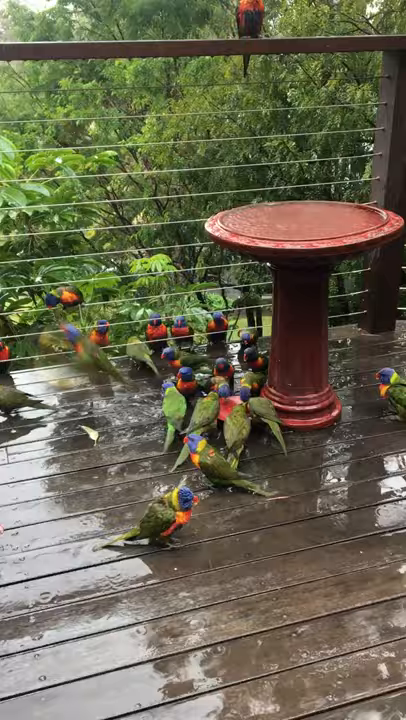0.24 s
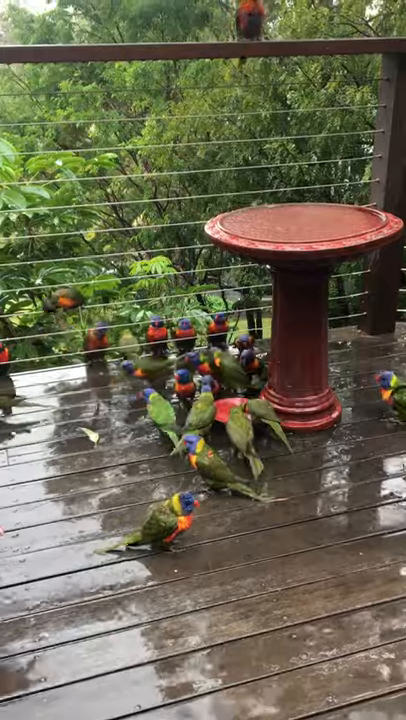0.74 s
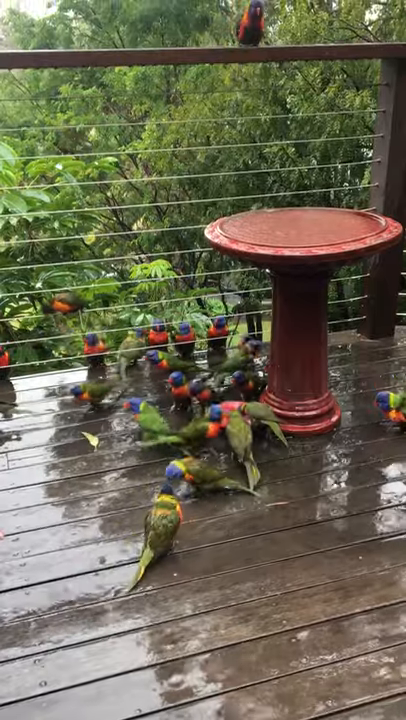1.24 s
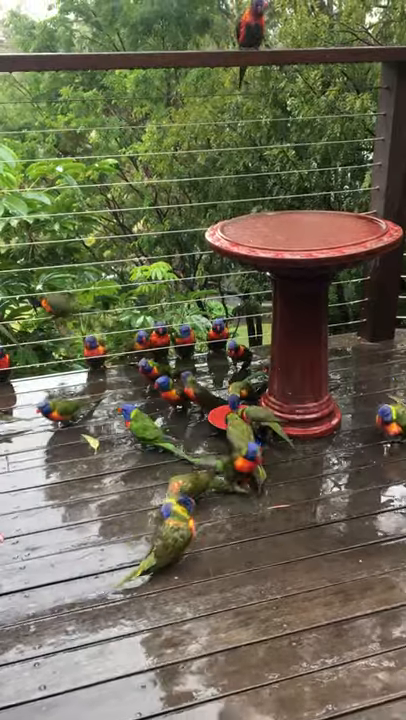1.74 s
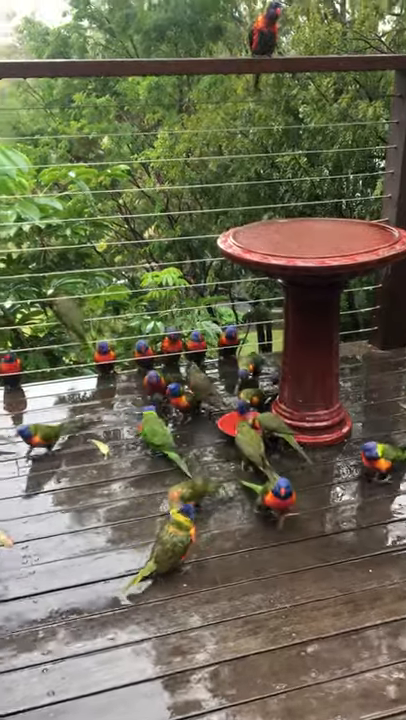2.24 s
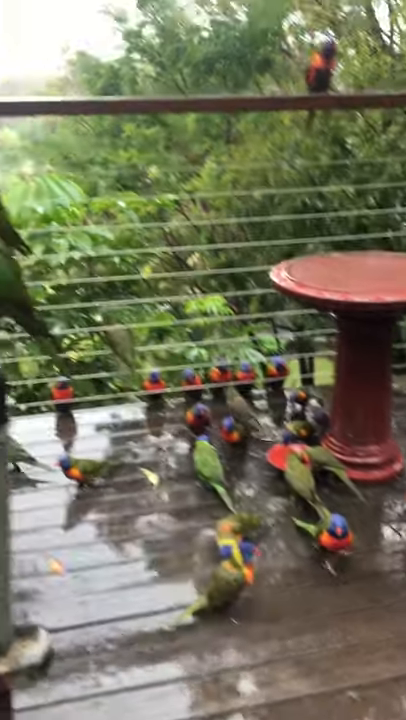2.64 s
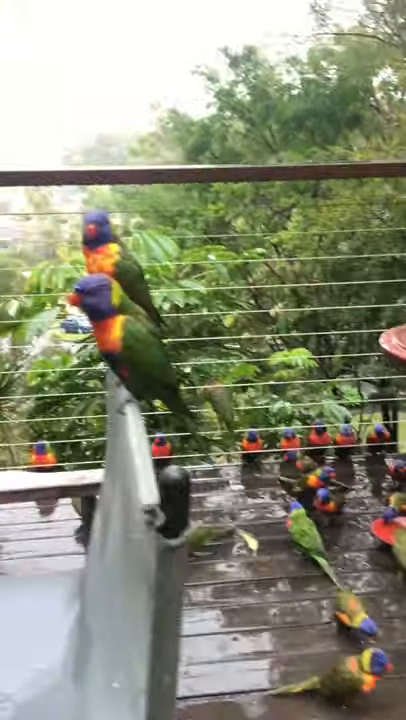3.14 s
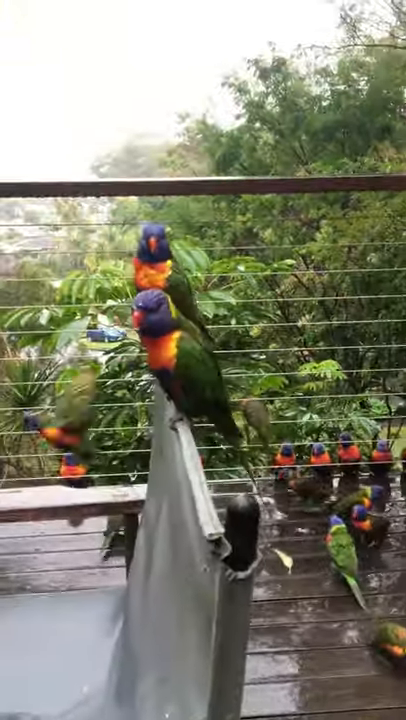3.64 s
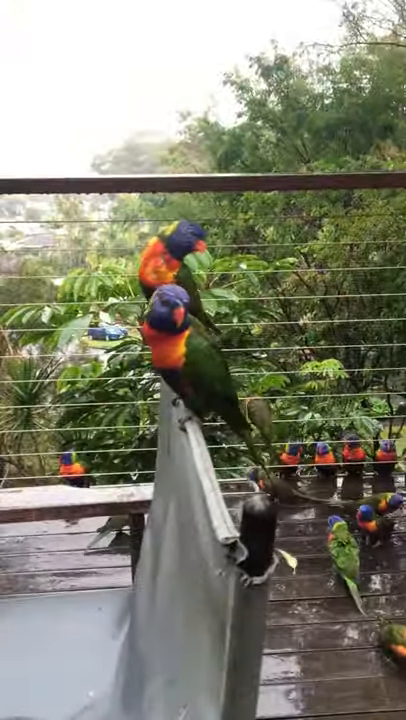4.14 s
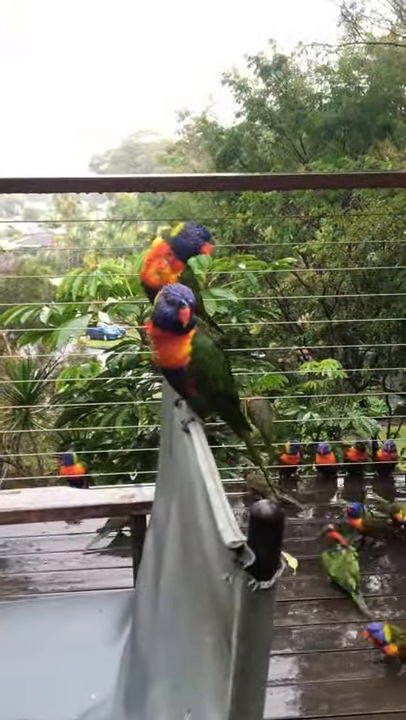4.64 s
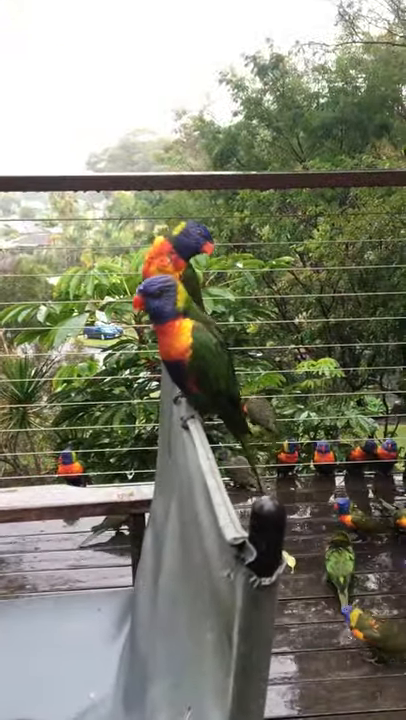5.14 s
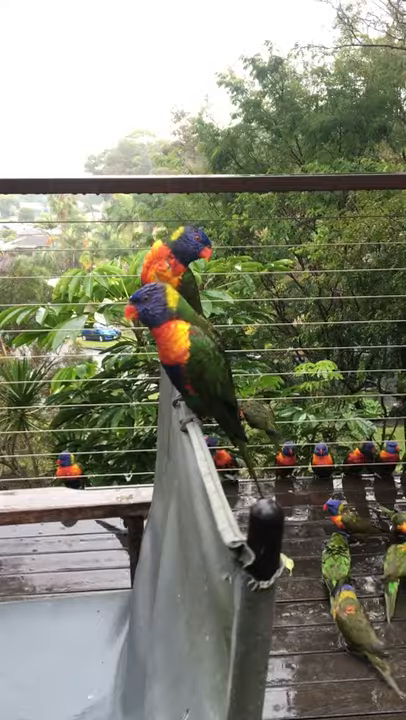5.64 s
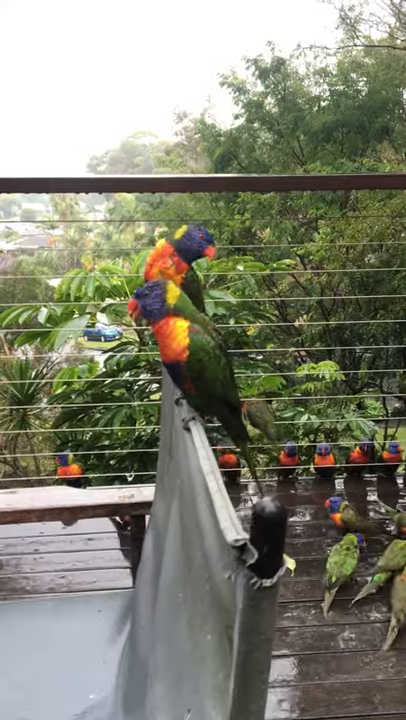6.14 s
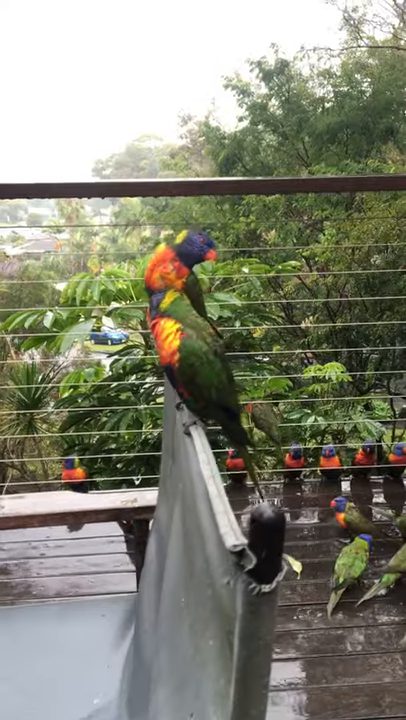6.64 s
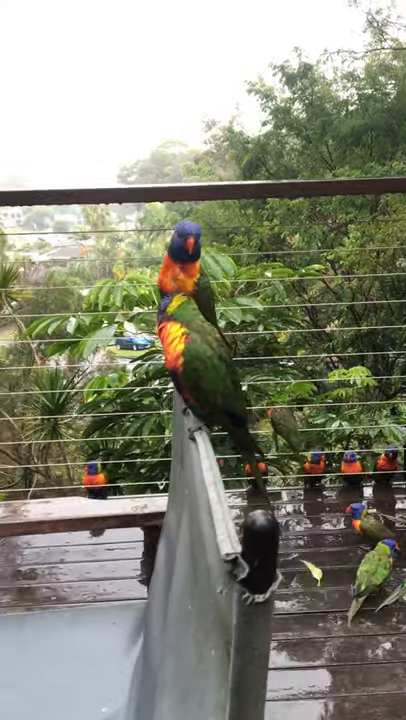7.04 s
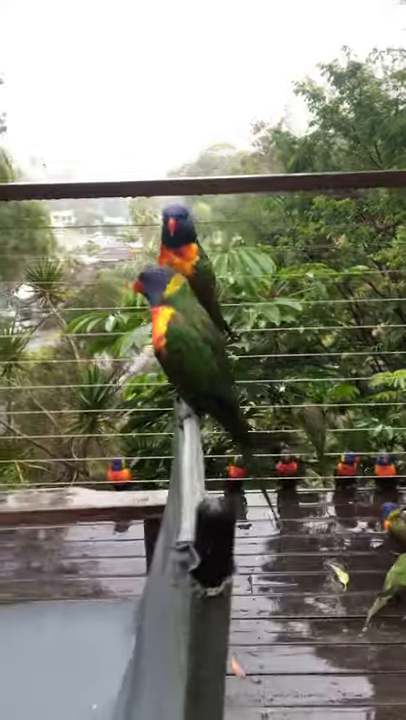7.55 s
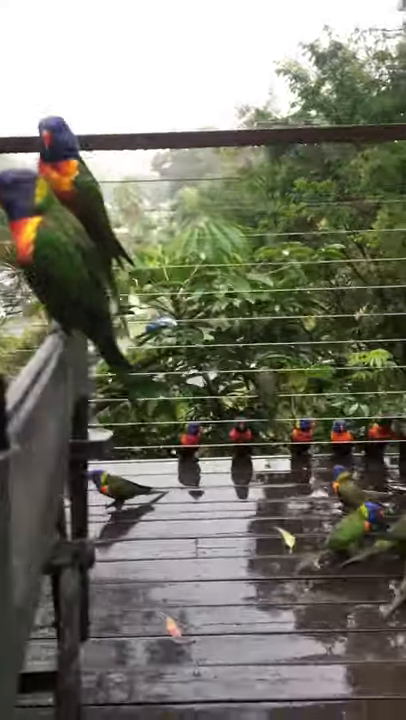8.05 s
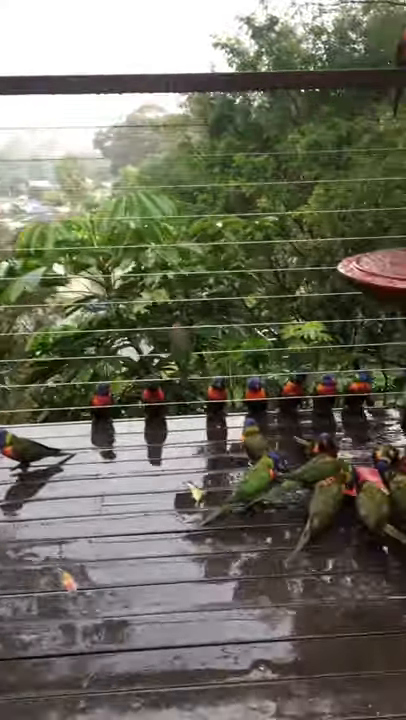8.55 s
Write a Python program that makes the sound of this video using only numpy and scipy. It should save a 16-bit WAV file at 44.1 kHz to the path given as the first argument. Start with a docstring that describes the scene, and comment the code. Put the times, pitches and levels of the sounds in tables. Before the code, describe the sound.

Rainbow-colored parrots screech, yodel and chatter in sharp loud bursts on a wet wooden balcony, with pauses of soft outdoor wash and faint wingbeats.

```python
"""Lorikeets screech and chatter on a wooden balcony, close to the microphone.
Each call is a vibrating membrane coloured by throat and beak: whistles leap between registers,
and rasps flutter. Sparse reflections and a duller tail place the birds between house and garden.
Two light noise bursts tap the deck; farther off, shaped noise makes passing wingbeats,
a soft outdoor wash and a faint hum."""
import sys
import numpy as np
from scipy import signal
from scipy.fft import rfft, irfft, next_fast_len
from scipy.io import wavfile
from scipy.ndimage import uniform_filter1d

SR = 44100
rng = np.random.default_rng(int(sys.argv[2]) if len(sys.argv) > 2 else 0)


def wav_out(sig):
    """Save sig, one row per channel (or a flat mono array), as 16-bit PCM at SR to the path in sys.argv[1]."""
    wavfile.write(sys.argv[1], SR, np.round(np.clip(np.atleast_2d(sig).T, -1, 1) * 32767).astype(np.int16))


N = 387638
TIME = np.arange(N) / SR
EDGE_HZ = 15780  # upper band limit at the microphone

# Levels of calls and squabbles are those at the bird, before the flock gain and the balcony.
# Yodels flip between registers; cycle_s is one high-low pair and level_db the fundamental:
# start_s, end_s, low_hz, high_hz, cycle_s, level_db
YODELS = [(.392, .454, 2750, 3670, 0.041, -17.5), (2.041, 2.171, 2830, 3690, .049, -12.5),
          (2.317, 2.415, 2915, 3787, .052, -12.5), (3.15, 3.207, 2994, 4200, 0.052, -21.5),
          (5.215, 5.305, 3453, 4517, .042, -8.5)]
HIGH_OVERTONES_DB, LOW_OVERTONES_DB = -16, -8  # against the fundamental
HIGH_SHARE = .45  # part of a cycle spent in the high register
# each note bends to the other register: by this share at its end, by half of it at its start
HIGH_DROOP, LOW_LIFT = .07, 0.053
YODEL_SCATTER = .014  # typical share by which the pitch differs from note to note

# Rising screeches, a low lead-in that leaps up and climbs; lead_rise is a share of pitch
# either side of the lead-in's middle:
# leap_s, end_s, leap_hz, top_hz, lead_rise, lead_db, fundamental_db, overtones_db
SCREECHES = [(1.812, 1.89, 2660, 2987, .025, -24, -19.5, -21),
             (3.3, 3.387, 2598, 2980, .045, -25, -24, -23.5),
             (4.283, 4.304, 2750, 2796, 0.17, -32.5, -17, -26.5),
             (7.122, 7.214, 2353, 2880, 0.025, -34, -24.5, -27),
             (7.599, 7.709, 2588, 3220, 0.035, -26, -17.5, -21)]
# the lead-in's middle lies a little over a minor third below the leap; overtones against its fundamental
LEAD_S, LEAD_RATIO, LEAD_OVERTONES_DB = .048, 0.823, -9
CLIMB_AT_MIDDLE = .72  # share of the climb made by halfway: it slows towards the top

# Plain whistles, most of them the sagging end of a call:
# start_s, end_s, first_hz, last_hz, fundamental_db, overtones_db
WHISTLES = [(0.1, .121, 3400, 3450, -18, -52), (.121, 0.182, 2567, 2615, -38.5, -21.5),
            (.177, 0.306, 2940, 2870, -19.5, -30), (0.451, 0.634, 2925, 2693, -17, -31.5),
            (3.207, 3.224, 3870, 4280, -19, -44), (4.33, 4.368, 2810, 2500, -29, -22),
            (2.303, 2.415, 2155, 1750, -28.5, -40), (2.415, 2.588, 2952, 2696, -25, -46.5),
            (3.037, 3.072, 3380, 3950, -17, -25), (3.096, 3.15, 2910, 3025, -20.5, -43),
            (3.254, 3.33, 3605, 2880, -23.5, -31), (3.435, 3.508, 3124, 3380, -27, -28.5),
            (4.369, 4.516, 3342, 3002, -22, -26), (5.026, 5.089, 3680, 2980, -28, -44.5),
            (5.299, 5.347, 4610, 4564, -6.5, -20.5), (5.294, 5.41, 2765, 3080, -25, -28.5),
            (5.343, 5.447, 3500, 2827, -12.5, -22), (7.01, 7.052, 2120, 2270, -33, -41),
            (7.725, 7.775, 3420, 3020, -21, -33), (7.72, 7.785, 3094, 3360, -23.5, -27),
            (8.408, 8.469, 1436, 1510, -35, -35)]
GLIDE_AT_MIDDLE = .24  # share of the slide made by halfway: it comes late

# Peeps, one arch of pitch each: start_s, end_s, top_hz, level_db
PEEPS = [(1.619, 1.702, 3317, -26.5), (1.888, 1.964, 3310, -17.5), (1.952, 2.026, 3177, -17),
         (2.268, 2.283, 4530, -22), (3.403, 3.435, 3346, -21.5), (4.305, 4.33, 4180, -18.5),
         (4.955, 5.016, 4630, -30.5), (7.595, 7.655, 4160, -24.5), (7.659, 7.726, 4510, -22)]
PEEP_RISE, PEEP_FALL = .13, 0.1176  # start and end lie this share below top_hz

# Nasal honks in the lowest register: start_s, end_s, first_hz, last_hz, level_db
HONKS = [(0.175, .287, 1380, 1415, -32.5), (1.859, 1.958, 1518, 1452, -22), (1.991, 2.051, 1627, 1382, -15),
         (3.959, 3.998, 935, 870, -33), (3.999, 4.05, 957, 930, -27), (4.053, 4.107, 977, 967, -27.5),
         (4.833, 4.885, 1584, 1597, -36.5), (5.188, 5.218, 1700, 1630, -11),
         (7.043, 7.056, 1475, 940, -30.5), (7.482, 7.491, 1396, 970, -39.5),
         (7.547, 7.595, 1015, 1101, -27)]
HONK_ARCH = 0.0278  # share by which the pitch lifts in the middle

# Harsh rasps; roughness runs 0-1: start_s, end_s, pitch_hz, level_db, flutter_hz, roughness
RASPS = [(.294, 0.401, 2802, -22, 96, 0.42), (1.973, 2.04, 3850, -23, 123.7, 0.63),
         (2.244, 2.255, 2837, -19.5, 68.63, 0.34), (2.293, 2.321, 3040, -19.5, 125, 0.41),
         (3.024, 3.036, 3340, -27.5, 110.7, 0.55), (3.06, 3.102, 3247, -22, 94, 0.53),
         (5.236, 5.248, 3450, -11, 80, 0.47), (5.419, 5.551, 2813, -27, 89.5, 0.43),
         (5.6, 5.687, 2330, -22, 110.1, 0.5), (5.99, 6.16, 1388, -28, 132.2, 0.3),
         (7.53, 7.546, 1176, -29.5, 82.7, .55), (8.079, 8.126, 2360, -37, 119, 0.56),
         (8.361, 8.415, 2600, -38, 96, 0.5)]
RASP_RISE = 0.0305  # the pitch creeps from this share below pitch_hz to this share above

# Warbling chatter, a slow flutter on a glide:
# start_s, end_s, first_hz, last_hz, fundamental_db, overtones_db, flutter_hz
WARBLES = [(0.0, 0.103, 1355, 1518, -40.5, -31, 51), (1.536, 1.762, 2498, 2676, -32.5, -46.5, 36.7),
           (3.527, 3.89, 2040, 1550, -45, -54.5, 19.8), (4.884, 4.955, 3830, 2860, -35, -49, 31.4)]
WARBLE_ROUGH = .33  # roughness 0-1

# Colour that throat and beak give the overtones: frequency_hz, level_db
THROAT = [(1800, 6), (3400, 6.5), (4600, 3), (6700, -3), (8000, -9.5), (11500, -12.5), (15500, -25)]
# The throat favours the middle treble, so low notes sound mostly through their overtones:
# pitch at which fundamental and overtones are equally strong, and the slope of their balance
EVEN_HZ, OVERTONES_DB_PER_OCTAVE = 2446, -13

# Squabbles, where more birds chirp over one another: start_s, end_s, chirp_db
SQUABBLES = [(0.0, 0.391, -37), (1.522, 1.76, -36), (1.847, 2.04, -25.5), (2.121, 2.296, -33),
             (4.75, 4.953, -45.5)]
CHIRPS_PER_S, CHIRP_S = 32, .035
CHIRP_LOW_HZ, CHIRP_HIGH_HZ = 1299, 3604  # range of starting pitch
CHIRP_SLIDE = .15  # mean size of a slide up or down, as a share of pitch

# Light taps on the deck, level at the onset before reflections: start_s, level_db
TAPS = [(1.123, -39), (1.143, -33.5)]

# Birds flying past; fade_s is the time either side of nearest_s at which the amplitude is 1/e,
# half_hz the frequency at which the air puff's amplitude is halved: nearest_s, fade_s, half_hz, level_db
FLIGHTS = [(1.032, 0.32, 87, -45), (3.805, 0.24, 385, -44), (6.106, 0.38, 117, -45)]

# Spectral shape of the outdoor wash, relative level per Hz: frequency_hz, level_db
WASH = [(25, -27), (60, -6.5), (115, 0), (170, -3.5), (500, -8.5), (3000, -13), (9000, -25), (15500, -31.5)]
WASH_DB = -45.5  # level of the whole wash


def gain_of(db):
    """Decibels to amplitude."""
    return 10 ** (np.asarray(db) / 20)


def evened(x):
    """Scales to rms 1."""
    return x / np.sqrt(np.mean(x ** 2) + 1e-20)


def read(points, hz):
    """Reads a spectrum on a log-frequency axis."""
    f, value = np.transpose(points)
    return np.interp(np.log(hz + 1), np.log(f + 1), value)


def add(mix, s, sound):
    """Mixes a sound in at time s."""
    part = mix[max(round(s * SR), 0):][:len(sound)]
    part += sound[:len(part)]


def noise(size, shape):
    """Noise of about rms 1 whose amplitude spectrum follows shape(Hz)."""
    full = next_fast_len(size + SR // 10)
    spectrum = rfft(rng.standard_normal(full)) * shape(np.fft.rfftfreq(full, 1 / SR))
    return evened(irfft(spectrum, full))[:size]


def wander(size, hz):
    """Random drift, mostly slower than hz."""
    return noise(size, lambda f: 1 / (1 + (f / hz) ** 4))


def voiced(hz, db):
    """Shares a note's level between fundamental and overtones, by its pitch."""
    overtones_db = OVERTONES_DB_PER_OCTAVE * np.log2(hz / EVEN_HZ)
    tone_db = db - 10 * np.log10(1 + gain_of(overtones_db) ** 2)
    return tone_db, tone_db + overtones_db


def glide(start, end, first_hz, last_hz, tone_db, overtones_db, at_middle):
    """A note that slides one way, and has made the share at_middle of its slide halfway through."""
    middle_hz = first_hz + at_middle * (last_hz - first_hz)
    return start, end, first_hz, middle_hz, last_hz, tone_db, overtones_db


def yodel(start, end, low_hz, high_hz, cycle_s, db):
    """The notes of a yodel: a pure high one and a brighter low one take turns."""
    shortest_s = .008
    notes = []
    for s in np.arange(start, end, cycle_s):
        flip = s + HIGH_SHARE * cycle_s
        high = (s, flip, high_hz, -HIGH_DROOP, HIGH_OVERTONES_DB)
        low = (flip, s + cycle_s, low_hz, LOW_LIFT, LOW_OVERTONES_DB)
        for on, off, hz, bend, overtones_db in [high, low]:
            if on < end - shortest_s:
                pitch = hz * (1 + YODEL_SCATTER * rng.standard_normal())
                arch = pitch * (1 + bend / 2), pitch, pitch * (1 + bend)
                notes.append((on, min(off, end), *arch, db, db + overtones_db))
    return notes


def screech(leap, end, leap_hz, top_hz, lead_rise, lead_db, tone_db, overtones_db):
    """The two notes of a rising screech: the low lead-in, then the climb."""
    hz = LEAD_RATIO * leap_hz
    arch = hz * (1 - lead_rise), hz, hz * (1 + lead_rise)
    lead = (leap - LEAD_S, leap, *arch, lead_db, lead_db + LEAD_OVERTONES_DB)
    return [lead, glide(leap, end, leap_hz, top_hz, tone_db, overtones_db, CLIMB_AT_MIDDLE)]


def peep(start, end, top_hz, db):
    """A note that swings up to its top pitch and back."""
    return start, end, top_hz * (1 - PEEP_RISE), top_hz, top_hz * (1 - PEEP_FALL), *voiced(top_hz, db)


def honk(start, end, first_hz, last_hz, db):
    """A low note that slides, slightly arched."""
    middle_hz = (first_hz + last_hz) / 2 * (1 + HONK_ARCH)
    return start, end, first_hz, middle_hz, last_hz, *voiced(middle_hz, db)


def clear_notes():
    """All calls with a clear pitch, as notes to be whistled."""
    yodels = [note for row in YODELS for note in yodel(*row)]
    screeches = [note for row in SCREECHES for note in screech(*row)]
    whistles = [glide(*row, GLIDE_AT_MIDDLE) for row in WHISTLES]
    peeps = [peep(*row) for row in PEEPS]
    honks = [honk(*row) for row in HONKS]
    return yodels + screeches + whistles + peeps + honks


def harsh_notes():
    """All fluttering calls, as notes to be rasped."""
    rasps = [(start, end, hz * (1 - RASP_RISE), hz * (1 + RASP_RISE), *voiced(hz, db), flutter_hz, rough)
             for start, end, hz, db, flutter_hz, rough in RASPS]
    return rasps + [(*row, WARBLE_ROUGH) for row in WARBLES]


def syllable(start, end, soft_s=.018):
    """Progress 0-1, gate and onset of a note: runs join tightly, lone ends swell and fade."""
    joint_s, reach_s = .004, .012  # crossfade in a run; ends nearer than reach_s count as joined
    starts, ends = np.transpose([note[:2] for note in clear_notes() + harsh_notes()])
    following = starts[abs(starts - end).argmin()]
    rise = joint_s if abs(ends - start).min() < reach_s else soft_s
    end, fall = (following, joint_s) if abs(following - end) < reach_s else (end, soft_s)
    length = max(end - start, reach_s)
    t = np.arange(-rise / 2, length + fall / 2, 1 / SR)
    gate = np.clip(np.minimum((t - t[0]) / rise, (t[-1] - t) / fall), 0, 1)
    return np.clip(t / length, 0, 1), np.sin(np.pi / 2 * gate) ** 0.84, start - rise / 2


def syrinx(hz, tone_db, overtones_db, half_db, shimmer_db=3.5):
    """A vibrating membrane: a fundamental, and overtones coloured by the throat."""
    phase = 2 * np.pi * (np.cumsum(hz) / SR + rng.random())
    overtones = np.zeros(len(hz))
    for k in range(2, int(EDGE_HZ / hz.mean()) + 2):
        colour_db = read(THROAT, abs(k * hz)) + shimmer_db * wander(len(hz), 62)
        overtones += gain_of(colour_db) * (k * hz < SR / 2) * np.sin(k * phase)
    # alternate cycles come and go in strength: faint lines halfway between the harmonics
    doubling = 1 + gain_of(half_db) * wander(len(hz), 34) * np.sin(phase / 2)
    tone = gain_of(tone_db) * evened(np.sin(phase))
    return doubling * (tone + gain_of(overtones_db) * evened(overtones))


def whistle(start, end, first_hz, middle_hz, last_hz, tone_db, overtones_db,
            waver=0.0038, jitter_hz=20, break_hz=115, settle_s=0.011, sag_db_per_octave=45):
    """A clear note on an arch of pitch: it breaks in roughly, settles, and weakens where its pitch is lower."""
    u, gate, onset = syllable(start, end)
    hz = np.polyval(np.polyfit([0, .5, 1], [first_hz, middle_hz, last_hz], 2), u)
    # notes under 0.13 s lose less strength
    sag_db = sag_db_per_octave * min((end - start) / 0.13, 1) * np.log2(hz / hz.max())
    effort_db = sag_db + wander(len(u), 55)
    # the same unsteadiness in Hz leaves high notes pure and makes low ones hoarse
    unsteady_hz = jitter_hz + break_hz * np.exp(-TIME[:len(u)] / settle_s)
    hz = hz * (1 + waver * wander(len(u), 91)) + unsteady_hz * wander(len(u), 940)
    return onset, gate * evened(gain_of(effort_db)) * syrinx(hz, tone_db, overtones_db, half_db=-39.5)


def rasp(start, end, first_hz, last_hz, tone_db, overtones_db, flutter_hz, rough,
         swing=0.076, throb_db=10.0, rattle_hz=1500, swell_db=6):
    """The membrane flutters, each pulse a small chirp; an unsteady second vibration adds sidebands."""
    u, gate, onset = syllable(start, end)
    flutter = flutter_hz * (1 + 0.89 * rough * wander(len(u), flutter_hz))
    beat = 2 * np.pi * np.cumsum(flutter) / SR
    chaos = .08 * rough * wander(len(u), 340)
    hz = (first_hz + (last_hz - first_hz) * u) * (1 + swing * np.sin(beat) + chaos)
    rattle = rattle_hz * (1 + .18 * wander(len(u), 340))
    second = np.sin(2 * np.pi * np.cumsum(rattle) / SR)
    # the cry swells to a peak late in the note and throbs with the flutter
    effort_db = swell_db * np.sin(2 * u) - throb_db * rough * np.cos(beat)
    strength = evened(gain_of(effort_db) * (1 + rough * second))
    return onset, gate * strength * syrinx(hz, tone_db, overtones_db, half_db=-15)


def squabble(start, end, db):
    """Short chirps of random pitch and slide, as notes to be whistled."""
    notes = []
    for when, height, slide in rng.random((round(CHIRPS_PER_S * (end - start)), 3)):
        s = start + when * (end - start - CHIRP_S)
        hz = CHIRP_LOW_HZ * (CHIRP_HIGH_HZ / CHIRP_LOW_HZ) ** height
        last_hz = hz * (1 + 2 * CHIRP_SLIDE * (2 * slide - 1))
        notes.append(glide(s, s + CHIRP_S, hz, last_hz, *voiced(hz, db), CLIMB_AT_MIDDLE))
    return notes


def taps(centre_hz=3000, t60_s=0.046):
    """Each tap is a short burst from the boards: broad noise round centre_hz, quickly damped."""
    out, t = np.zeros(N), TIME[:SR // 10]
    for s, db in TAPS:
        burst = noise(len(t), lambda f: 1 / (1 + np.log((f + 1) / centre_hz) ** 2 * 2))
        add(out, s, gain_of(db - 60 * t / t60_s) * burst)
    return out


def balcony(x, near_db=-15, near_t60_s=0.31, far_db=-22, far_t60_s=0.53, dull_hz=6000):
    """Sparse reflections from deck and wall, with a duller, longer tail from the garden."""
    t = TIME[:SR]
    sparse = rng.standard_normal(SR) * (rng.random(SR) < 1500 / SR)  # about 1500 reflections per second
    near = sparse * gain_of(-60 * t / near_t60_s)
    far = noise(SR, lambda f: 1 / (1 + (f / dull_hz) ** 2)) * gain_of(-60 * t / far_t60_s)
    echoes = gain_of(near_db) * near / np.linalg.norm(near) + gain_of(far_db) * far / np.linalg.norm(far)
    return x + signal.fftconvolve(x, echoes * (t > .002))[:N]  # nothing returns within 2 ms


def wings(beats_per_s=12.9, beat_db=7):
    """Birds fly past: each wingbeat pushes a soft puff of air."""
    out = np.zeros(N)
    for nearest, fade, half_hz, db in FLIGHTS:
        air = noise(N, lambda f: (f > 45) / (1 + (f / half_hz) ** 2))
        beats = evened(gain_of(beat_db * np.cos(2 * np.pi * beats_per_s * (TIME - nearest))))
        out += gain_of(db) * np.exp(-((TIME - nearest) / fade) ** 2) * beats * air
    return out


def outdoors(hum_hz=656, hum_db=-57.0, hum_peak_s=6.3, hum_fade_s=2.74):
    """A steady wash of shaped noise, and a faint hum of narrow noise that swells and fades once."""
    wash = gain_of(WASH_DB) * noise(N, lambda f: gain_of(read(WASH, f)))
    hum = noise(N, lambda f: 1 / (1 + (f - hum_hz) ** 2 / 10))
    return wash + gain_of(hum_db) * np.exp(-((TIME - hum_peak_s) / hum_fade_s) ** 2) * hum


def scene(flock_db=3.0, lowest_hz=950):
    """The flock and the taps on the balcony, with wings and the outdoors behind."""
    flock = np.zeros(N)
    for note in clear_notes() + [note for row in SQUABBLES for note in squabble(*row)]:
        add(flock, *whistle(*note))
    for note in harsh_notes():
        add(flock, *rasp(*note))
    # a small beak radiates no bass
    beak = signal.cheby1(6, .5, lowest_hz, "high", fs=SR, output="sos")
    flock = signal.sosfilt(beak, flock)
    return (balcony(gain_of(flock_db) * flock + taps()) + wings() + outdoors())[None]


def record(dry, knee_db=-20, squeeze=0.23, recovery_db_per_s=14):
    """Gain control ducks with loud calls and recovers slowly; peaks are rounded off; then the band limit."""
    power_db = 10 * np.log10(abs(uniform_filter1d(dry[0] ** 2, size=400)) + 1e-12)
    # the tracked level jumps up with the sound and falls at recovery_db_per_s
    fall_db = recovery_db_per_s * TIME
    tracked_db = np.maximum.accumulate(power_db + fall_db) - fall_db
    over_db = np.maximum(tracked_db - knee_db, 0)
    ducked = dry / gain_of(squeeze * over_db)
    rounded = ducked / (1 + abs(ducked) ** 10) ** (1 / 10)
    band_limit = signal.firwin(511, EDGE_HZ, window=("kaiser", 10), fs=SR)
    return signal.oaconvolve(rounded, band_limit[None], "same")


dry = scene()
out = record(dry)
wav_out(out)
```